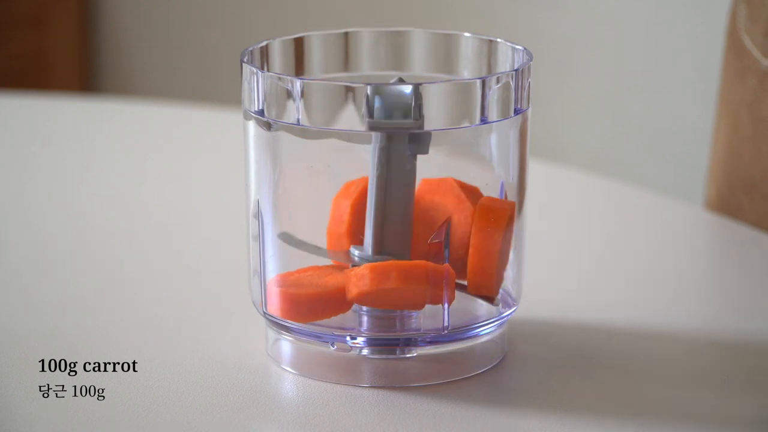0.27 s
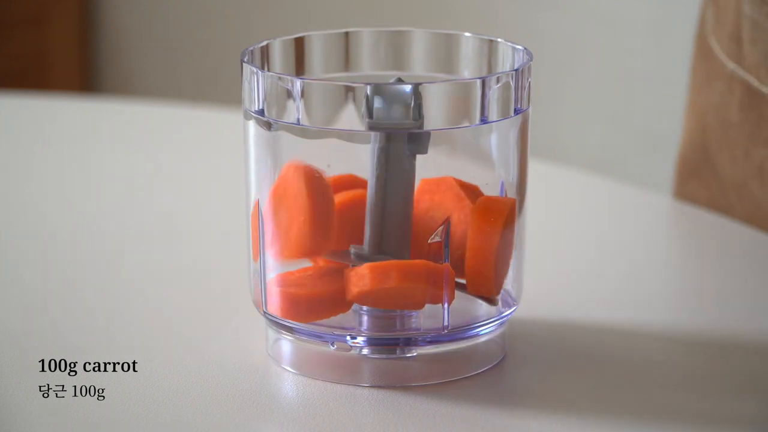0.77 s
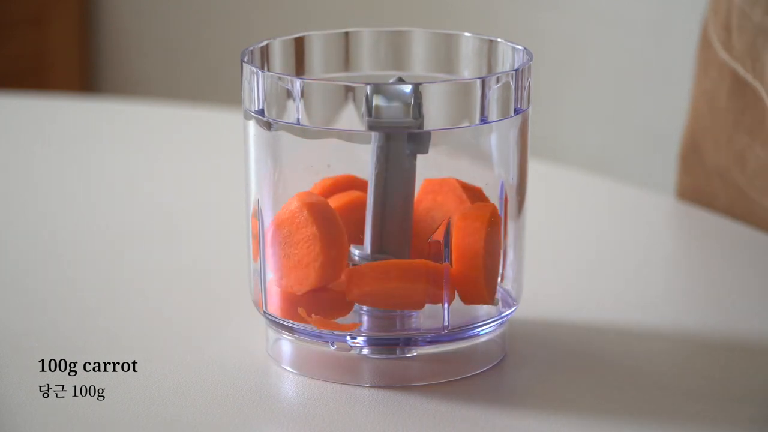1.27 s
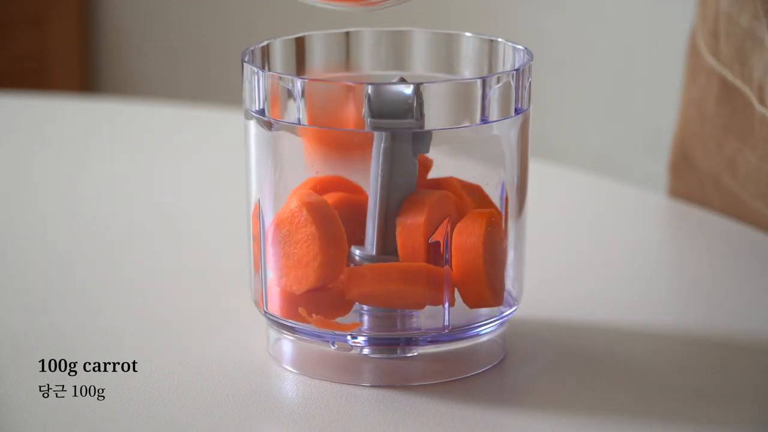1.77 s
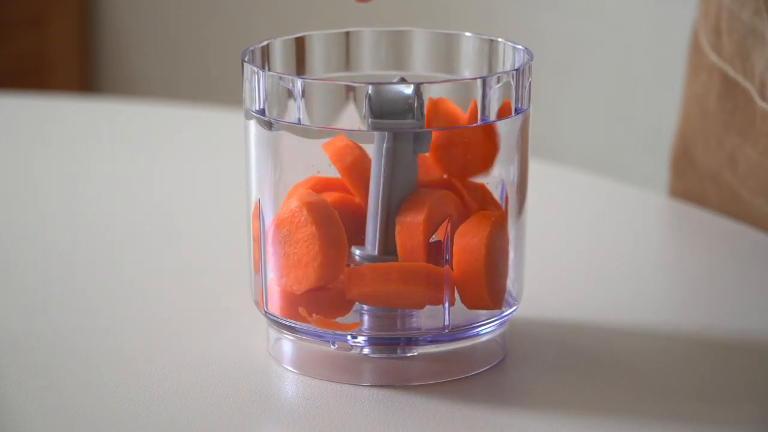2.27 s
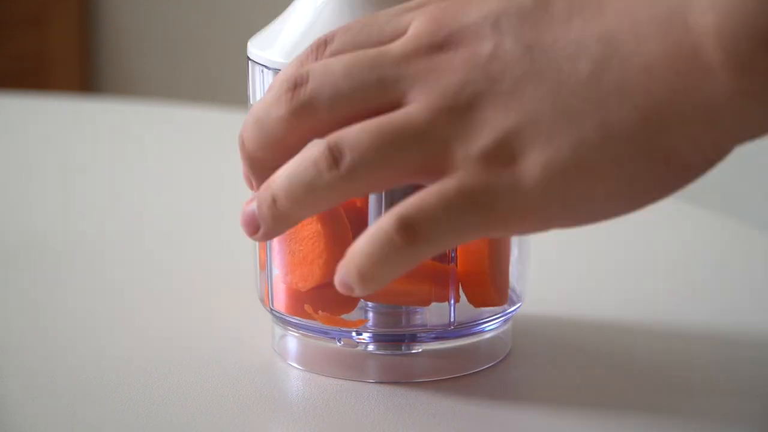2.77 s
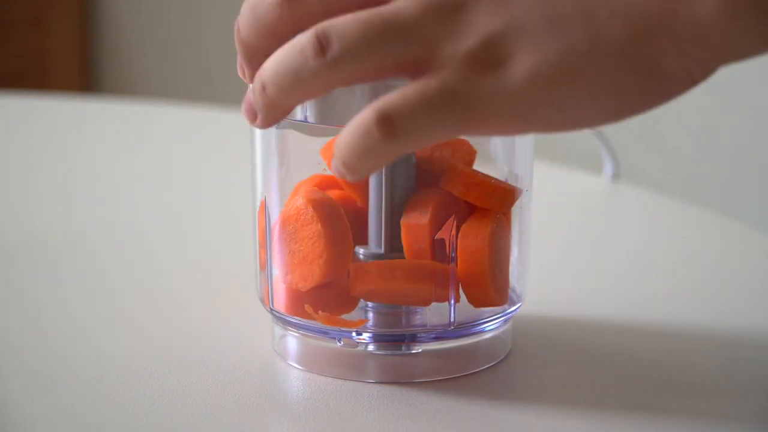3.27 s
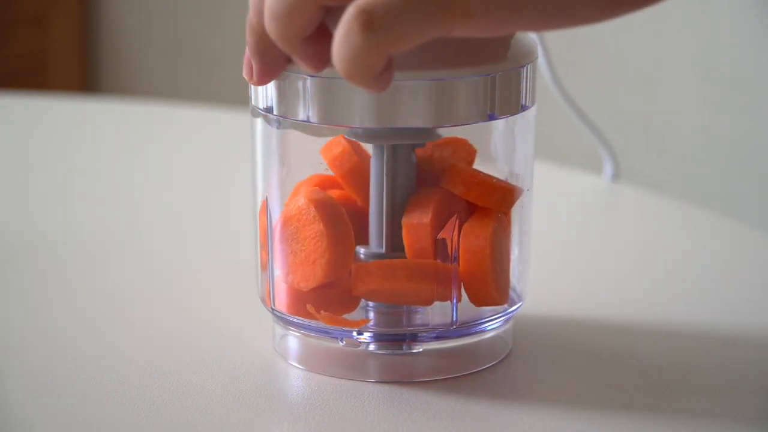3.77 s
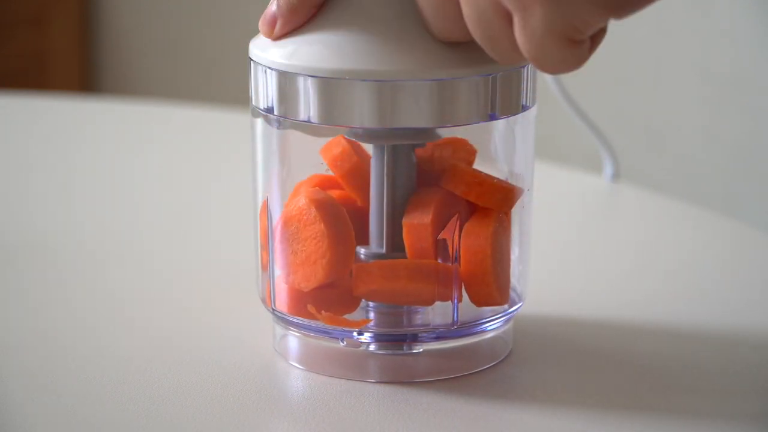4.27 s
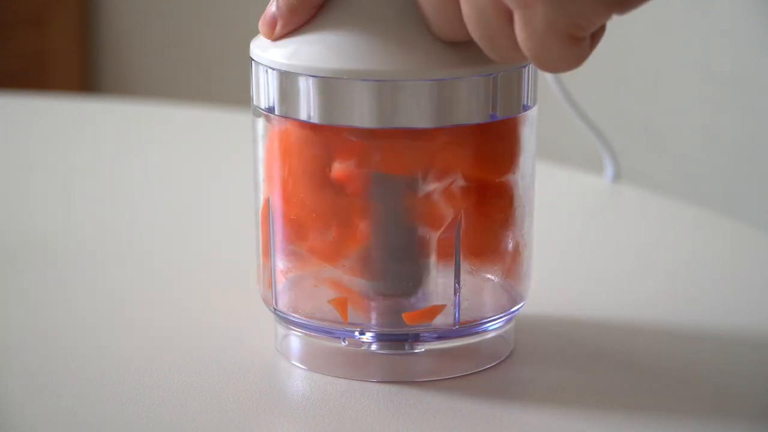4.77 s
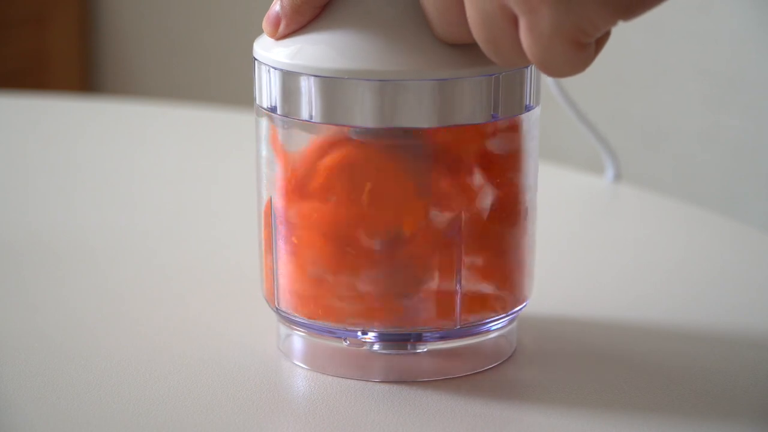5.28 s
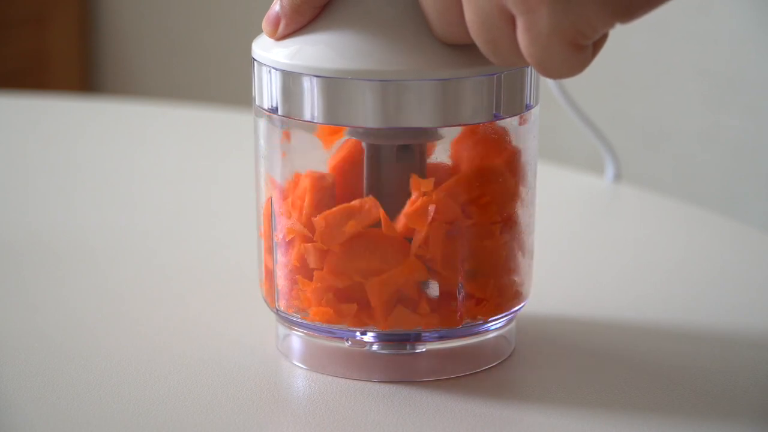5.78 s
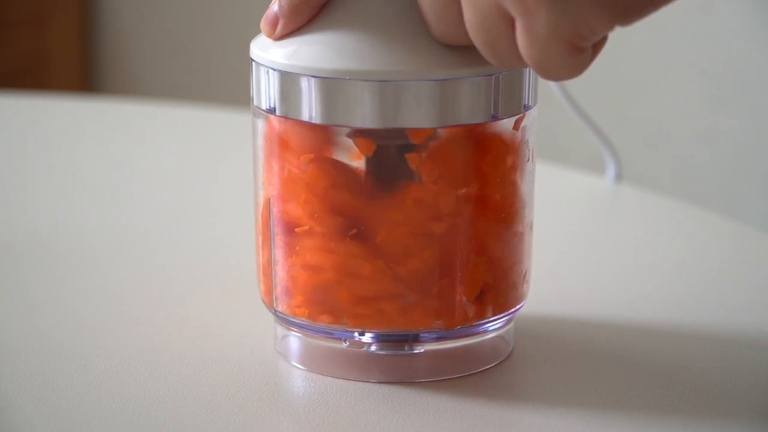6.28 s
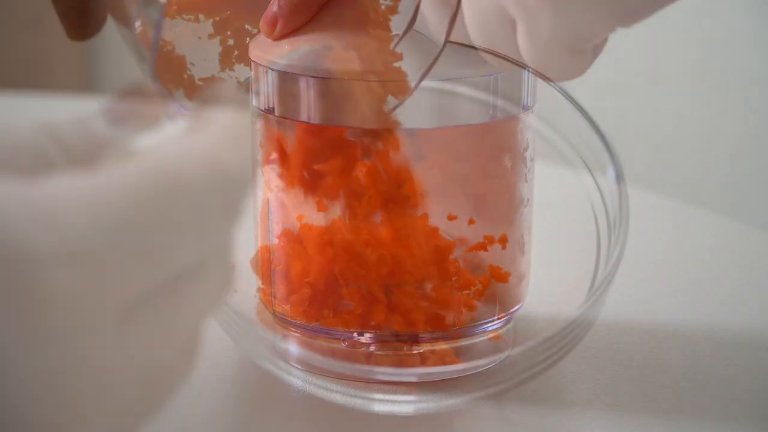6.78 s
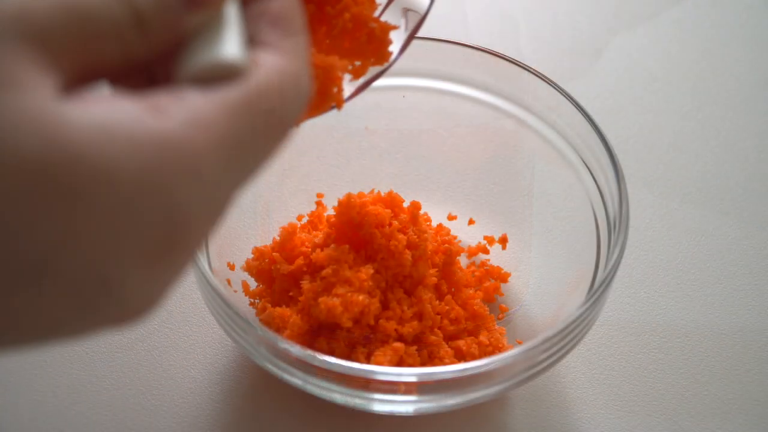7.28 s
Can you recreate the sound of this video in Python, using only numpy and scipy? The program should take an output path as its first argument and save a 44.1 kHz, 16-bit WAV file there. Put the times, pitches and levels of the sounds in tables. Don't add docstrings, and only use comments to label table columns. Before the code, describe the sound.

Close, compressed pickup in a small hard-walled kitchen with very faint hum. From 0 to 0.25 s carrot slices drop into a plastic cup: hollow knocks around a mid pitch, wet slaps, a brief steel blade ring. Small finger clicks and soft sleeve rustle follow. More slices land at 0.72-0.87 s, a glass dish ticks near 1.14 s, and looser clusters tumble at 1.5-2.5 s, duller as the heap grows. The lid lands softly at 2.8 s; crisp clicks and skin scuffs run until 3.5 s, then near quiet. Loud chopper pulses start abruptly at 4.72, 5.30, 5.92, 6.50 and 7.07 s, each about 0.2 s powered, then coasting down: whining gears, tumbling thuds, crunching cuts, wet spray. Chunks bang early; later bursts are finer, fading from 6.4 s. At 7.37 s a spatula hits the cup with a hard bright rap and a faint clump drops.

```python
import sys
import numpy as np
from scipy import signal
from scipy.fft import rfft, irfft, next_fast_len
from scipy.io import wavfile
from scipy.ndimage import uniform_filter1d

SR = 44100
rng = np.random.default_rng(int(sys.argv[2]) if len(sys.argv) > 2 else 0)


def voltage_ratio(level):
    return 10 ** (np.asarray(level, float) / 20)


def wav_out(sig):
    wavfile.write(sys.argv[1], SR, np.round(np.clip(np.atleast_2d(sig).T, -1, 1) * 32767).astype(np.int16))


N = 331191

# [t/s, wall level/dB, hollow level/dB, slap level/dB, nearest wall tone f/Hz]
DROPS = [(.001, -20, -15, -44, 880), (.012, -17, -14, -34, 810), (.06, -17, -21, -28, 800),
         (.077, -13, -20, -25, 820), (.111, -27, -28, -29, 915), (.205, -24, -29, -58, 840),
         (.228, -24, -24, -50, 810), (.7245, -40, -26, -43, 850), (.744, -26, -19, -47, 810),
         (.7535, -13.5, -18, -32, 810), (.769, -11, -23, -27, 815), (.797, -30, -24, -37, 815),
         (.809, -18, -26, -55, 830), (.826, -18, -20, -31, 890), (.874, -21, -27, -46, 810),
         (1.515, -12, -19, -39, 850), (1.598, -15, -15, -41, 840), (1.622, -10, -16, -41, 880),
         (1.654, -15, -13, -38, 880), (1.661, -11, -40, -45, 815), (1.707, -23, -20, -48, 815),
         (1.718, -21, -27, -60, 810), (1.733, -31, -27, -43, 815), (1.759, -23, -32, -41, 815),
         (1.826, -20, -20, -55, 815), (1.853, -16, -14, -43, 825), (1.961, -27, -24, -55, 810),
         (1.991, -27, -21, -51, 810), (2.02, -29, -27, -52, 825), (2.206, -28, -24, -52, 820),
         (2.246, -14, -22, -45, 915), (2.27, -22, -26, -60, 900), (2.282, -12, -22, -46, 875),
         (2.312, -9, -23, -29, 815), (2.409, -25, -30, -60, 890), (2.448, -11, -26, -40, 900),
         (2.489, -24, -32, -62, 920)]
# [t/s, peak level/dB]
SLAPS = [(.015, -25), (.192, -52), (.84, -36), (.8465, -30), (1.611, -34), (1.8223, -37), (2.2403, -25),
         (2.419, -56)]
# [t/s, peak level/dB]
BLADE_HITS = [(.008, -28), (.06, -21), (.076, -16.5), (.111, -32), (.724, -40), (.769, -28), (.797, -36),
              (.841, -26), (.8455, -18), (1.515, -40), (1.611, -27), (1.718, -40), (1.76, -37),
              (1.823, -40), (1.853, -35), (1.961, -40), (1.992, -41), (2.02, -50), (2.208, -45),
              (2.282, -33), (2.313, -42), (2.448, -40)]
# [t/s, peak level/dB]
BUMPS = [(.002, -45), (.826, -36), (1.394, -57), (1.47, -51), (1.598, -31), (1.652, -32), (2.37, -36),
         (3.301, -55), (3.39, -55), (3.44, -52), (3.468, -48.5), (3.558, -47.5), (3.584, -51.5),
         (3.637, -61)]
# [centre t/s, length/s, level/dB]
RUSTLE = [(.02, .3, -56), (.51, .14, -63), (1.08, .3, -59), (2.37, .2, -60), (3.7, .5, -76),
          (4.05, .4, -68)]
# [t/s, peak level/dB, centre f/Hz, thud level/dB]
CLICKS = [(0.4083, -46, 3560, -7), (0.4421, -55, 3300, -5), (.977, -34, 3800, -8), (1.316, -60, 4500, 14),
          (1.394, -60, 4000, 19), (1.412, -54, 5000, 8), (2.0514, -50.5, 4180, 5), (2.1745, -47, 4270, -10),
          (2.613, -52, 4600, -15), (2.8757, -50, 5200, 5), (2.9786, -27, 4600, -30),
          (3.1048, -52.5, 7060, -0.5), (3.2581, -58.5, 6100, -8.5), (3.301, -47.5, 5220, -20),
          (3.3298, -63, 5580, -18), (3.3621, -40, 3600, -12), (3.3927, -41, 3600, -5.5),
          (3.4401, -27, 4000, -17), (3.4794, -60, 4000, -5), (3.8647, -54, 3600, 4), (4.5176, -56, 3430, 7)]
# [t/s, peak level/dB]
DISH_TICKS = [(1.1418, -33.5), (1.174, -46), (2.1733, -54)]
# [t/s, peak level/dB]
RIM_TICKS = [(1.411, -46), (1.4706, -37)]
# [t/s, length/s, level/dB, centre f/Hz]
SCUFFS = [(2.907, 0.11, -64.5, 4300), (3.1, 0.024, -64, 6000), (3.255, .04, -66, 6000),
          (3.37, 0.18, -61.5, 4320), (3.854, .02, -68.5, 6000), (1.305, .02, -65, 4690)]

WALL = [(815, 0, .05), (880, -1, .03), (925, -2, .035), (985, -4, .025), (1150, -8, .02), (1390, -10, .025),
        (1510, -12, .025), (1600, -14, .015), (1900, -17, .015), (2150, -19, .015)]
# [f/Hz, level/dB, t60/s]
AIR = [(291, -2.5, 0.15), (388.5, -2, 0.11), (454.2, -1.5, 0.1), (493, -0.5, 0.082), (596, -2, 0.05)]
# [f/Hz, level/dB, t60/s]
TABLE = [(90.5, 1.5, 0.34), (160.4, 12, 0.21)]
# [f/Hz, level/dB, t60/s]
BLADE = [(2970, -13, .2), (3020, 0, .035), (3090, -8, .03), (4110, -20, .05)]
# [f/Hz, level/dB, t60/s]
HUB = [(3100, -3, .02), (4300, -4, .018), (5190, -3, .018), (6030, 0, .022), (6780, -3, .018),
       (7400, -8, .014), (8700, -12, .012)]
# [f/Hz, level/dB, t60/s]
DISH = [(1090, 8, 0.069), (2370, 2.5, .07), (4300, 5, .09), (6500, 7, .05), (6770, -24, 0.94),
        (10000, -15, .04), (12000, -15.5, 0.067)]
# [f/Hz, level/dB, t60/s]
RIM = [(2280, 0, .03), (3100, -3, .018), (5900, -20, .012)]
# [f/Hz, level/dB, t60/s]
CHURN = [(155, -9, .09), (288, -5, .12), (385, -1, .07), (455, 1, .07), (605, -1, .06), (815, 1, .06)]
# [f/Hz, level/dB, t60/s]
EMPTY_CUP = [(805, -9, .035), (1147, -4, .022), (2600, -6, .01), (2945, -17, .3), (3040, -20, .06),
             (3100, 0, .01), (4000, 1.5, .008), (5000, -8, .006), (5650, -5, .006), (6100, -3, .006),
             (7700, -12, .008), (10300, -9, .003)]

# [on t/s, held/s, whine level/dB]
SWITCH = [(4.7232, .2, -6), (5.3005, .19, -2), (5.9172, .175, 1), (6.4955, .155, 1), (7.0655, .17, 3)]
# [pieces at rest t/s, level/dB, share of first bite (below 0: a softened start), drag on the
SETTLE = [(.395, -26.5, 1, 2.2), (.36, -26, 1, 1.2), (.36, -26.5, .8, .95), (.34, -26, -.2, 1.05),
          (.3, -28, -.4, .6)]
# [f/Hz at full speed, level/dB under cutting, unevenness/rad, speed exponent]
GEARS = [(2750, -7, .2, 1), (4050, -2.5, .18, 0), (6700, -5, .15, 0), (10400, -14, .26, 4),
         (15000, -30, .24, 6)]
# [t/s, peak level/dB, centre f/Hz]
CHUNKS = [(4.7232, -8, 3350), (4.7311, -9, 3520), (4.7546, -11, 3310), (4.8209, -16, 2990),
          (4.8708, -11, 4800), (4.9087, -15, 3030), (4.9287, -9, 4130), (4.9631, -12, 4230),
          (4.9733, -10, 2000), (4.9982, -17, 2420), (5.1382, -22, 3040), (5.3014, -9, 3550),
          (5.3064, -10, 3300), (5.3438, -14, 3360), (5.4171, -17, 4050), (5.4545, -10, 3910),
          (5.106, -22, 3080), (5.7718, -30, 2400), (6.2613, -19, 2680), (6.842, -28, 2400),
          (5.9165, -12, 3420), (5.9888, -12, 3990), (6.0202, -14, 4030), (6.1439, -14, 2890),
          (6.1953, -11, 3270), (6.2796, -11, 2400), (6.4956, -13, 5780), (6.5154, -12, 3000),
          (6.5789, -15, 3740), (6.6373, -13, 3890), (6.6762, -12, 3030), (6.8803, -30, 2670),
          (6.9491, -34, 3060), (7.0868, -23, 2770)]
# [t/s, peak level/dB, centre f/Hz]
LID_TICKS = [(4.7546, -15, 6050), (4.7915, -21, 6530), (4.8214, -20, 6320), (4.8514, -30, 6970),
             (4.8514, -15, 6030), (4.9731, -16, 6900), (5.013, -19, 6810), (5.0264, -25, 6980),
             (5.1063, -29, 6820), (5.1392, -25, 6980), (5.3093, -17, 7260), (5.3642, -22, 5910),
             (5.455, -15, 6090), (5.5184, -18, 5890), (5.5248, -16, 6010), (5.5563, -22, 5500),
             (5.5877, -21, 6390), (5.9249, -16, 7100), (5.9628, -19, 6960), (6.0746, -21, 6030),
             (6.1589, -18, 6340), (6.2637, -26, 6900), (6.2796, -24, 7190), (6.5444, -19, 6690),
             (6.7431, -25, 6200), (6.7545, -21, 6200), (6.8144, -34, 5990), (6.8423, -33, 6990),
             (6.8763, -37, 7080), (6.9491, -40, 7000), (7.0928, -28, 6910)]
# [t/s, peak level/dB]
THUMPS = [(5.053, -11), (5.074, -14), (5.344, -16), (5.494, -15), (5.584, -14), (5.654, -16), (5.714, -21),
          (5.768, -27), (5.868, -42), (5.949, -16), (6.029, -17), (6.183, -15), (6.243, -16), (6.789, -20),
          (6.843, -23)]
# [t/s, peak level/dB]
SPLINTERS = [(4.7313, -20), (4.7592, -21), (4.8056, -33), (4.845, -26), (4.8784, -29), (4.9288, -25),
             (4.9637, -33), (5.0131, -30), (6.29, -36), (6.79, -36), (6.867, -44), (5.1797, -47),
             (5.304, -18), (5.3434, -24), (5.3893, -34), (5.4441, -18), (5.515, -28), (5.5444, -27),
             (5.5878, -27), (5.6367, -30), (5.9206, -25), (6.0064, -32), (6.0627, -29), (6.1136, -30),
             (6.1585, -30), (6.4962, -30), (6.5985, -28), (6.6165, -28), (6.7222, -32), (6.7557, -30),
             (7.0689, -33)]

TUMBLE = [(29, -65), (50, -98), (92, -22), (165, 0), (253, -7), (448, 1.5), (664, -5.5), (808, 0),
          (906, -3), (1600, -6), (2200, -13), (3250, -23), (5500, -120)]
# [f/Hz, level/dB per Hz]
CUTTING = [(940, -9), (1600, 0.5), (2260, -6.5), (2410, 0.5), (2580, 0.5), (3570, 5), (3970, 5.5),
           (4830, 0.5), (6190, 1), (7090, -4), (8000, -75), (10400, -54), (17600, -120)]
# [f/Hz, level/dB per Hz]
SPRAY = [(4350, -20), (7400, 5.5), (8080, -4.5), (10200, -10.5), (15200, -28), (16200, -29)]
# [f/Hz, level/dB per Hz]
CLOTH = [(530, -27.5), (900, 1), (2130, -7), (2600, -16), (3030, -14), (4010, -5.5), (15000, -29)]
# [f/Hz, level/dB per Hz]
KITCHEN = [(15, -20), (30, -24), (65, -15), (149, -9), (181, -3), (250, -8), (279, -2.5), (319, -12.5),
           (645, -13.5), (739, -14.5), (1050, -22.5), (2430, -25), (5050, -31.5), (14100, -38.5),
           (16200, -30)]
# [f/Hz, t60/s, level/dB]
WALLS = [(100, 0.56, -2.5), (400, 0.22, -1), (1520, 0.51, -0.5), (3060, 0.54, -12), (6000, 0.44, -6.5),
         (12000, 0.3, -12.5)]
# [delay t/s, level/dB]
ECHOES = [(.0105, -16), (.0225, -17), (.025, -15), (.033, -21)]

CUSHION_DB_PER_S = 1.7
BLADE_DAMPING_PER_S, BLADE_RISE_PER_S = .5, .014
FAVOUR_DB, FAVOUR_HZ = 7, 45
# (level/dB, first bite/dB, bite/s, coasting loss/dB per s, loss at rest/dB, fall after rest/dB per s)
TUMBLING = (-.3, -6, .015, -6, 6, 130)
BITING = (-3, 7, .015, 27, 11, 125)
SPRAYING = (-10.5, 11, .015, 28, 8, 105)
JERK_DB, JERK_S, SLAM_DB = -3.5, .018, 11


def unit(x):
    return x / np.sqrt(np.mean(x ** 2) + 1e-20)


def along(points, hz):
    f, v = np.transpose(points)
    return np.interp(np.log(hz + 1), np.log(f + 1), v)


def coloured(x, spectrum):
    m = next_fast_len(N + 8192)
    gain = voltage_ratio(along(spectrum, np.fft.rfftfreq(m, 1 / SR)))
    return unit(irfft(rfft(x, m) * gain, m)[:N])


def gravel(rate_hz, spread_db, share):
    struck = rng.random(N) < rate_hz / SR
    hits = struck * rng.standard_normal(N) * voltage_ratio(spread_db * rng.exponential(size=N))
    share = np.clip(share, 0, 1)
    return np.sqrt(share) * unit(hits) + np.sqrt(1 - share) * rng.standard_normal(N)


def ring(modes, attack_s, scatter_db=3, detune=0.0055):
    hz, db, t60_s = np.transpose(modes)[:, :, None]
    t = np.arange(int(min(.5, t60_s.max()) * SR)) / SR
    chance = rng.standard_normal((len(modes), 2))
    decay = voltage_ratio(db + scatter_db * chance[:, :1] - 60 * t / t60_s)
    tones = np.sin(2 * np.pi * hz * (1 + detune * chance[:, 1:]) * t)
    wave = (decay * tones).sum(0) * (1 - np.exp(-t / attack_s))
    return np.pad(wave, (0, SR // 2 - len(t))) / np.abs(wave).max()


def crack(hz, t60_s, width=0.91):
    t = np.arange(SR // 12) / SR
    edges_hz = np.clip([hz * np.exp(-width), hz * np.exp(width)], 50, 20000)
    band = signal.butter(3, edges_hz, "band", fs=SR, output="sos")
    snap = signal.sosfilt(band, rng.standard_normal(len(t)) * voltage_ratio(-60 * t / t60_s))
    return np.pad(snap, (0, SR // 2 - len(t))) / np.abs(snap).max()


def add(track, s, sound):
    part = track[round(s * SR):][:len(sound)]
    part += sound[:len(part)]


def hub_rattle():
    return ring(HUB, .0008, scatter_db=4, detune=.015)


def slap():
    return crack(4900, .018, width=.42) + 0.24 * crack(13000, .005, width=.22) + 0.45 * hub_rattle()


def slices():
    out = np.zeros(N)
    for s, wall_db, air_db, slap_db, near_hz in DROPS:
        dead_db = CUSHION_DB_PER_S * s
        modes = []
        for hz, db, t60_s in WALL:
            favour_db = FAVOUR_DB * np.exp(-((hz - near_hz) / FAVOUR_HZ) ** 2)
            modes.append((hz, db - dead_db * (hz > 1100) + favour_db, t60_s))
        wall = ring(modes, 0.0019, detune=0.008)
        wall += voltage_ratio(-6.5 - dead_db) * crack(1300, .05, width=.4)
        wall += voltage_ratio(-21) * crack(2500, .025, width=.35)
        hollow = ring(AIR, 0.0018) + voltage_ratio(-18 - dead_db) * ring(TABLE, .004)
        add(out, s, voltage_ratio(wall_db) * wall + voltage_ratio(air_db) * hollow + voltage_ratio(slap_db) * slap())
    for s, db in SLAPS:
        add(out, s, voltage_ratio(db) * slap())
    return out


def table_bumps():
    out = np.zeros(N)
    for s, db in BUMPS:
        add(out, s, voltage_ratio(db) * ring(TABLE, 0.0048))
    return out


def blade_hits():
    out = np.zeros(N)
    for s, db in BLADE_HITS:
        rise, damping = 1 + BLADE_RISE_PER_S * s, 1 + BLADE_DAMPING_PER_S * s
        steel = [(hz * rise, level_db, t60_s / damping) for hz, level_db, t60_s in BLADE]
        add(out, s, voltage_ratio(db) * (ring(steel, 0.00074) + 0.39 * hub_rattle()))
    return out


def cloth_rustle():
    t = np.arange(N) / SR
    swell = sum(voltage_ratio(db) * np.exp(-(2 * (t - s) / length_s) ** 2) for s, length_s, db in RUSTLE)
    return swell * coloured(gravel(1500, 2.5, .3), CLOTH)


def finger_clicks():
    out = np.zeros(N)
    for s, db, hz, thud_db in CLICKS:
        click = crack(hz, 0.005, width=0.55) + 0.15 * crack(13000, .003)
        add(out, s, voltage_ratio(db) * (click + voltage_ratio(thud_db) * ring(AIR + WALL, .001)))
    return out


def dish_ticks():
    out = np.zeros(N)
    for s, db in DISH_TICKS:
        add(out, s, voltage_ratio(db) * (ring(DISH, .0003) + .8 * crack(7000, 0.005)))
    for s, db in RIM_TICKS:
        add(out, s, voltage_ratio(db) * ring(RIM, 0.00019))
    return out


def scuffs():
    out = np.zeros(N)
    grit = gravel(2500, 1.7, .4)
    for s, length_s, db, hz in SCUFFS:
        piece = grit[round(s * SR):round((s + length_s) * SR)]
        edges_hz = np.clip([hz / 1.8, hz * 1.38], 50, 20000)
        band = signal.butter(2, edges_hz, "band", fs=SR, output="sos")
        add(out, s, voltage_ratio(db) * unit(signal.sosfilt(band, piece)) * np.sqrt(np.hanning(len(piece))))
    return out


def lid_landing():
    out = np.zeros(N)
    lid = crack(500, .07, width=.6) + .45 * crack(1400, .07, width=.5)
    lid += .35 * ring(TABLE + AIR, .002) + .12 * crack(5000, .01, width=1.1)
    add(out, 2.809, voltage_ratio(-29) * lid)
    return out


def whine(t, held_s):
    speed = (1 - .5 * np.exp(-t / .042)) * np.exp(-np.clip(t - held_s, 0, 1) / .18)
    turns = np.cumsum(speed) / SR
    slip = np.cumsum(rng.standard_normal((len(GEARS), len(t))), axis=1)
    out = np.zeros(len(t))
    for (hz, db, rough, power), jitter in zip(GEARS, slip):
        out += voltage_ratio(db) * speed ** power * np.sin(2 * np.pi * hz * turns + rough * jitter)
    return out


def load(t, held_s, rest_s, bite, drag, layer):
    db, bite_db, bite_s, coast_db_per_s, drop_db, fall_db_per_s = layer
    first_db = bite * bite_db if bite_db > 0 else bite_db
    still_s = np.clip(t - rest_s, 0, 1)
    level_db = db + first_db * np.exp(-t / bite_s)
    level_db -= drag * coast_db_per_s * np.clip(t - held_s, 0, rest_s - held_s)
    level_db -= drop_db * (1 - np.exp(-still_s / .035)) + fall_db_per_s * still_s
    return voltage_ratio(level_db)


def patchy(x):
    z = signal.stft(x, nperseg=256)[2]
    field = uniform_filter1d(rng.standard_normal(z.shape), size=6, axis=0)
    field = uniform_filter1d(field, size=6, axis=1)
    return unit(signal.istft(z * voltage_ratio(3 * unit(field)), nperseg=256)[1][:N])


def chopper_fade():
    return np.interp(np.arange(N) / SR, (6.4, 7.36), [1, 0]) ** 1.3


def pulses():
    blows = gravel(2000, 2.4, .55)
    lumps = voltage_ratio(2.3 * unit(uniform_filter1d(rng.standard_normal(N), 400)))
    cup = np.diff(ring(CHURN, .002, scatter_db=0))
    churn = unit(signal.fftconvolve(blows, cup)[:N])
    rolling = coloured(blows + 0.48 * rng.standard_normal(N), TUMBLE)
    tumble = unit(lumps * (rolling + voltage_ratio(-8.5) * churn))
    cutting = patchy(lumps * coloured(blows + 0.49 * rng.standard_normal(N), CUTTING))
    spray = patchy(coloured(blows + .5 * gravel(600, 3.5, 0.4), SPRAY))
    fade = chopper_fade()
    out = np.zeros(N)
    for (start_s, held_s, whine_db), (rest_s, db, first, drag) in zip(SWITCH, SETTLE):
        start = round(start_s * SR)
        t = np.arange(min(N - start, SR * 3 // 5)) / SR
        now = slice(start, start + len(t))
        bite = cutting[now] + voltage_ratio(whine_db) * whine(t, held_s)
        layers = [(tumble[now], TUMBLING), (bite, BITING), (spray[now], SPRAYING)]
        mix = sum(sound * load(t, held_s, rest_s, first, drag, layer) for sound, layer in layers)
        out[now] += voltage_ratio(db) * fade[now] * mix
    return out


def motor_kicks():
    out = np.zeros(N)
    fade = chopper_fade()
    for (start_s, *_), (_, db, *_) in zip(SWITCH, SETTLE):
        gain = voltage_ratio(db) * fade[round(start_s * SR)]
        add(out, start_s + JERK_S, gain * voltage_ratio(JERK_DB) * ring(TABLE[1:], .006))
        add(out, start_s + .003, gain * voltage_ratio(SLAM_DB) * crack(1700, .03, width=.4))
    return out


def flung_pieces():
    out = np.zeros(N)
    for s, db, hz in CHUNKS:
        lid = .35 * crack(6700, .014, width=.11)
        thud = voltage_ratio(-12) * ring(AIR + WALL, 0.0013)
        add(out, s, voltage_ratio(db - 3.5) * (crack(hz, 0.012, width=0.4) + lid + thud))
    for s, db, hz in LID_TICKS:
        add(out, s, voltage_ratio(db - 2) * crack(hz, .014, width=.08))
    for s, db in THUMPS:
        add(out, s, voltage_ratio(db - 3) * ring(CHURN[1:] + WALL[4:7], .002, scatter_db=4))
    for s, db in SPLINTERS:
        add(out, s, voltage_ratio(db) * crack(11000, .005, width=.35))
    return out


def spatula():
    out = np.zeros(N)
    blow = ring(EMPTY_CUP, .00015, scatter_db=1.5)
    blow += .4 * crack(4000, .008, width=.7) + .2 * crack(2600, .03, width=.5)
    blow += .25 * crack(12500, .003, width=.3) + voltage_ratio(-19) * crack(130, 0.008, width=1.36)
    add(out, 7.3746, voltage_ratio(-7) * blow)
    add(out, 7.444, voltage_ratio(-35) * crack(190, 0.027, width=0.63))
    return out


def room(x, wet_db):
    out = x.copy()
    dull = signal.lfilter(*signal.butter(2, 7000, fs=SR), x)
    for s, db in ECHOES:
        add(out, s, voltage_ratio(db) * dull)
    step, walls = SR // 4, np.array(WALLS)
    for start in range(0, N, step):
        hz, t, z = signal.stft(rng.standard_normal(SR // 2), SR, nperseg=256)
        t60_s = along(walls[:, :2], hz)[:, None]
        db = along(walls[:, ::2], hz)[:, None]
        decay = voltage_ratio(db - 60 * t / t60_s) / np.sqrt(t60_s) * np.clip(t / 0.022, 0, 1)
        tail = signal.istft(z * decay, SR, nperseg=256)[1]
        answer = signal.fftconvolve(x[start:start + step], tail / np.sqrt(SR / 20))
        add(out, start / SR + .003, voltage_ratio(wet_db) * answer)
    return out


def scene():
    hum = voltage_ratio(-64) * coloured(rng.standard_normal(N), KITCHEN)
    cup = room(slices() + blade_hits() + lid_landing() + spatula(), -3)
    hands = room(table_bumps() + cloth_rustle() + finger_clicks() + dish_ticks() + scuffs(), -9)
    chopper = room(pulses() + motor_kicks() + flung_pieces(), -9.5)
    return (cup + hands + chopper + hum)[None]


def roll_off(x):
    return signal.sosfilt(signal.butter(12, 16970, fs=SR, output="sos"), x)


def record(dry):
    held = dry / (1 + np.abs(dry / .32) ** 4) ** (1 / 4)
    held = signal.lfilter(*signal.butter(2, 65, "high", fs=SR), held)
    held = irfft(rfft(held) * (np.fft.rfftfreq(N, 1 / SR) < 15750), N)
    return roll_off(held)


dry = scene()
out = record(dry)
wav_out(out)
```